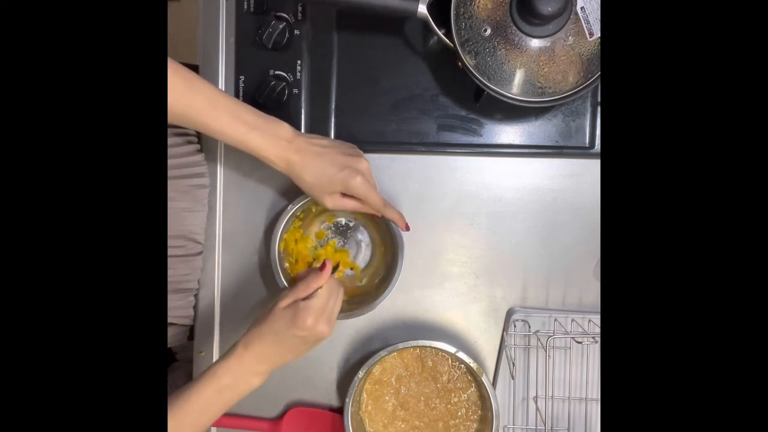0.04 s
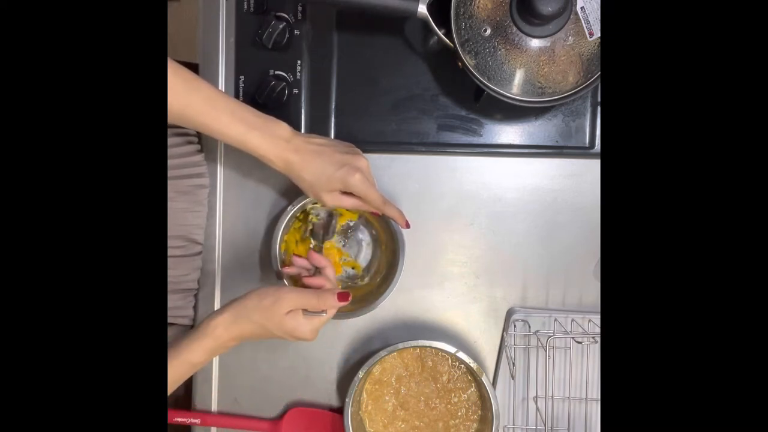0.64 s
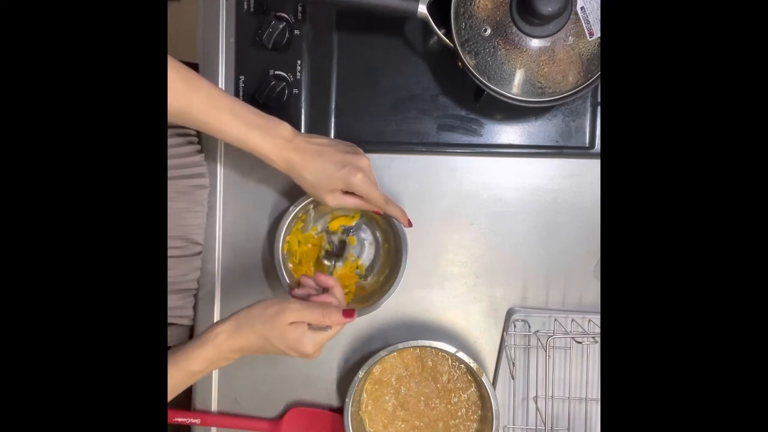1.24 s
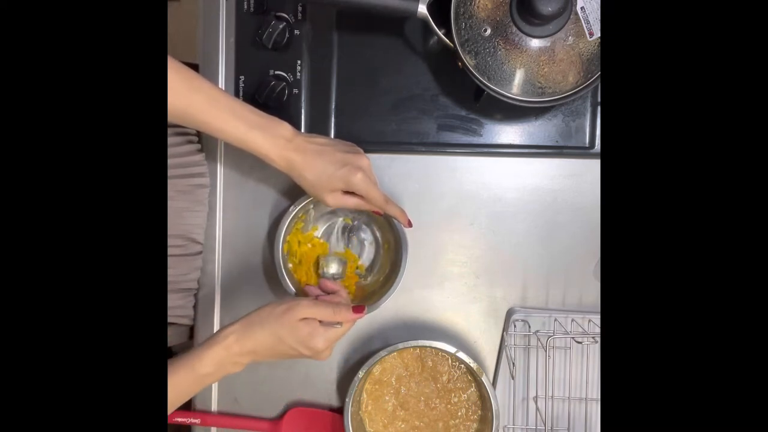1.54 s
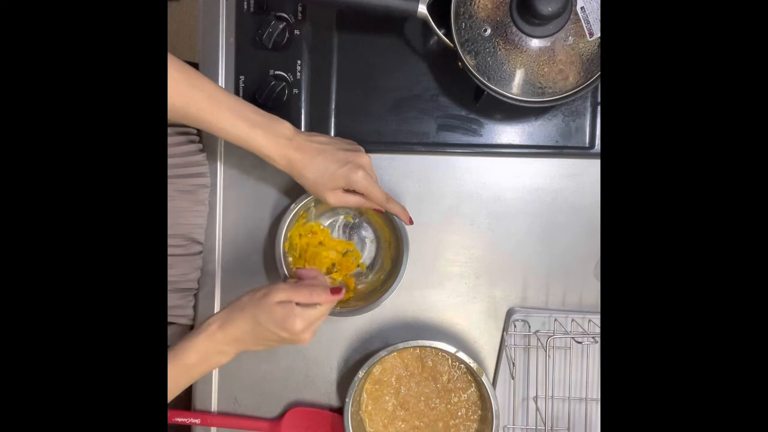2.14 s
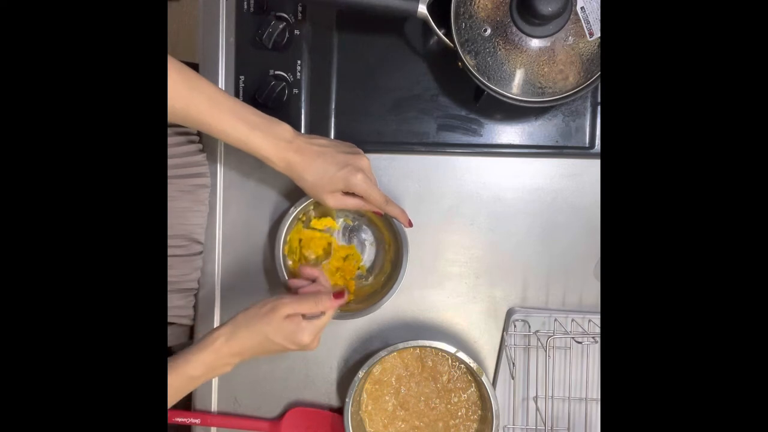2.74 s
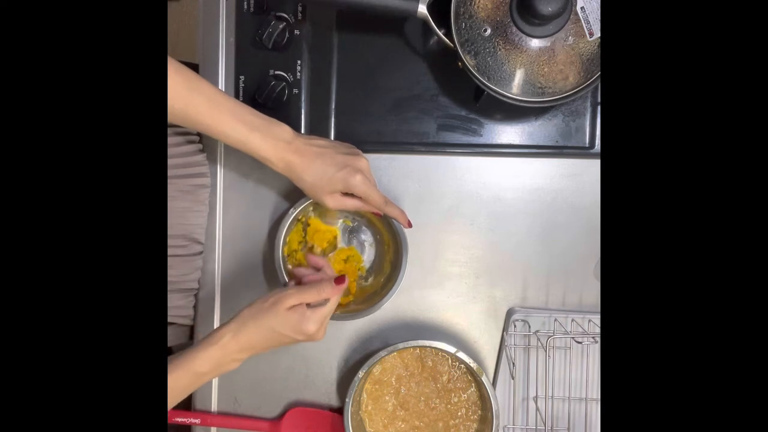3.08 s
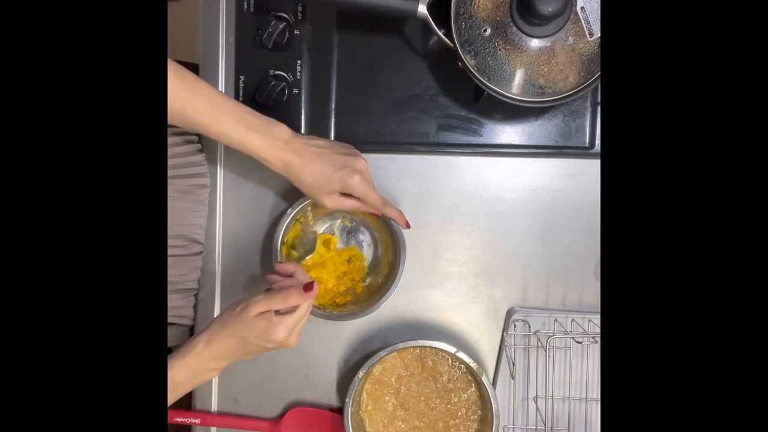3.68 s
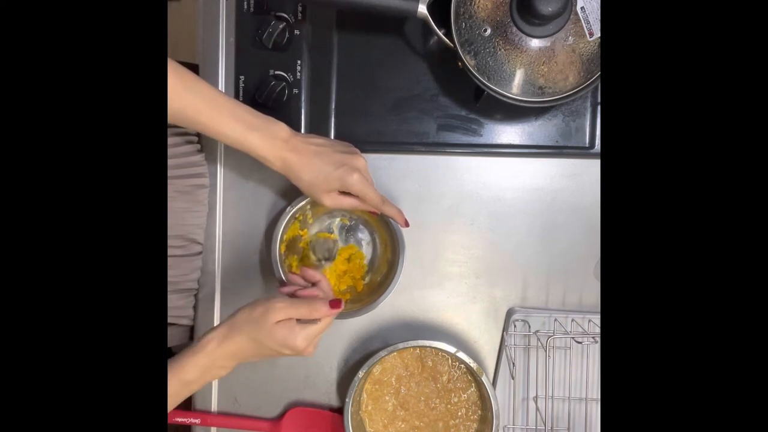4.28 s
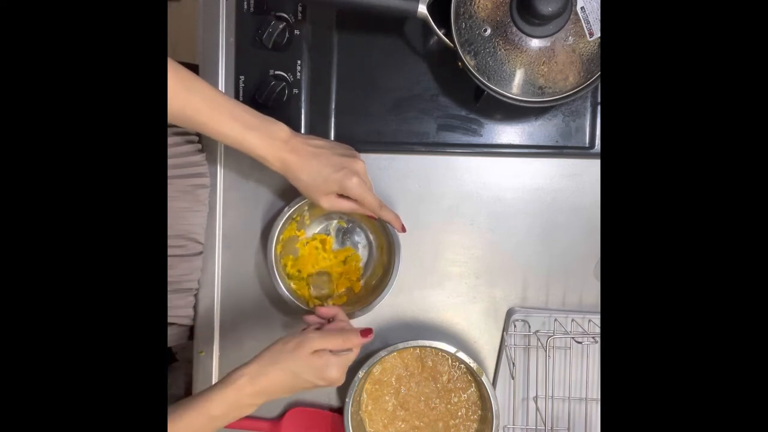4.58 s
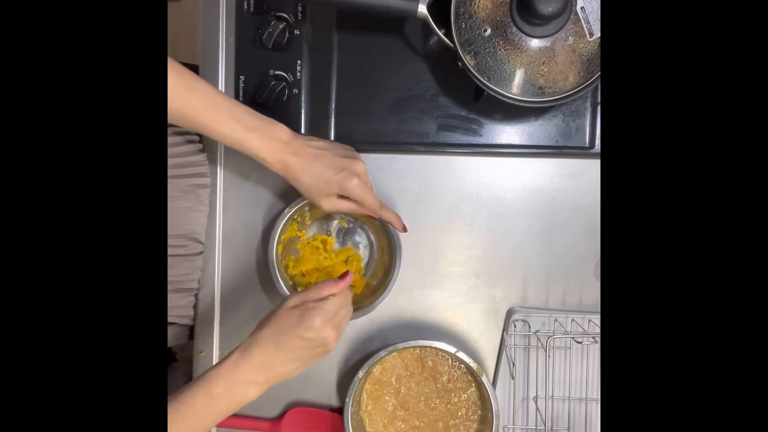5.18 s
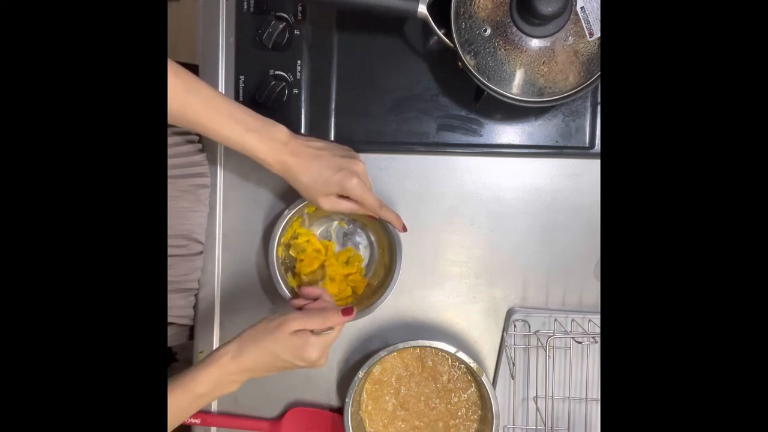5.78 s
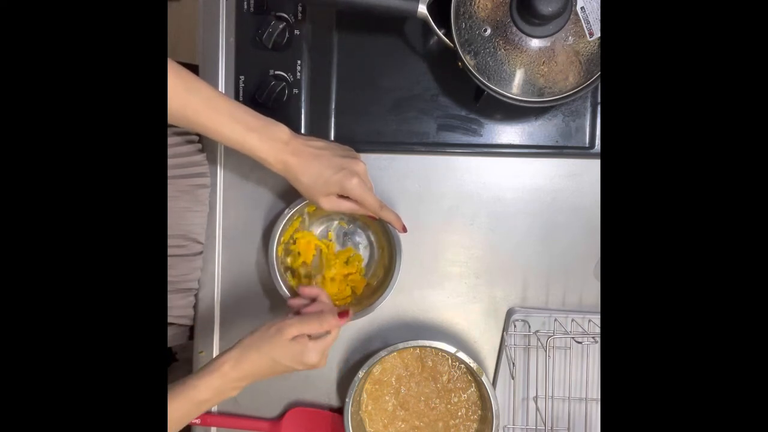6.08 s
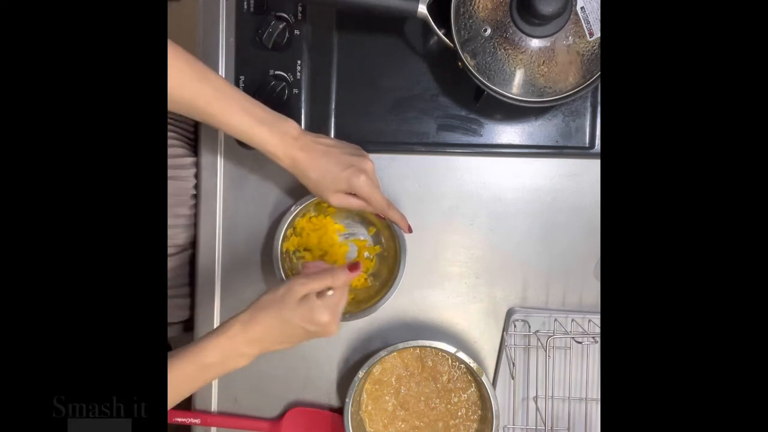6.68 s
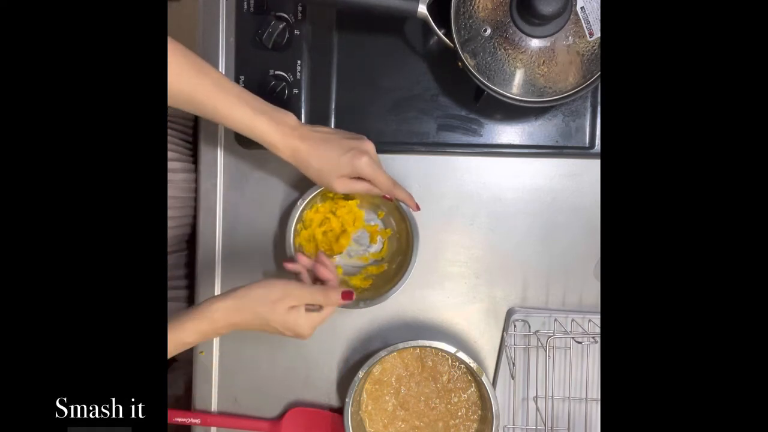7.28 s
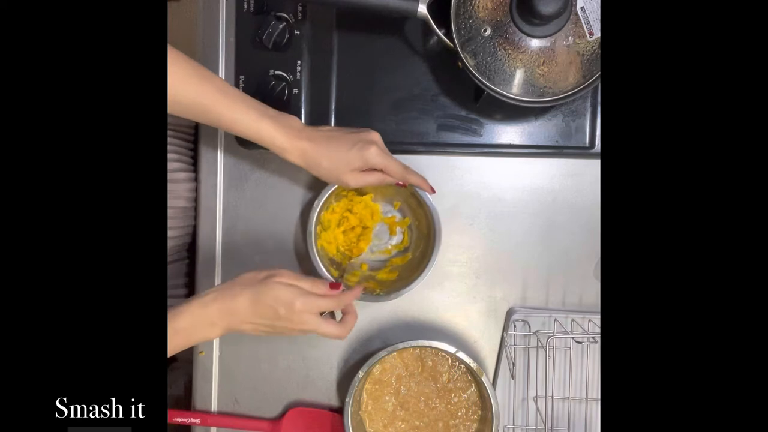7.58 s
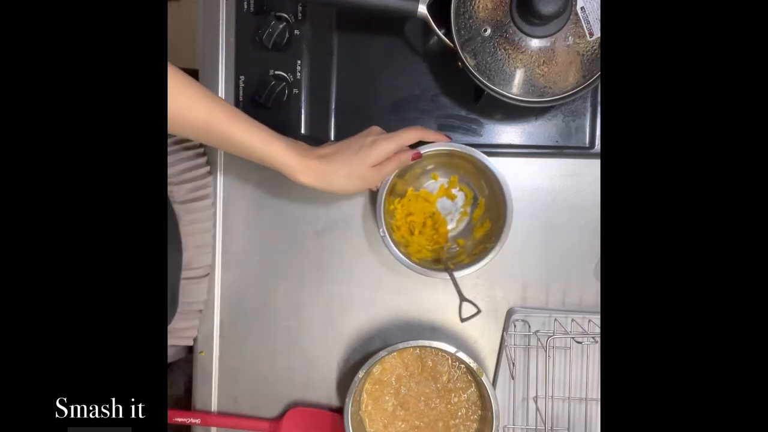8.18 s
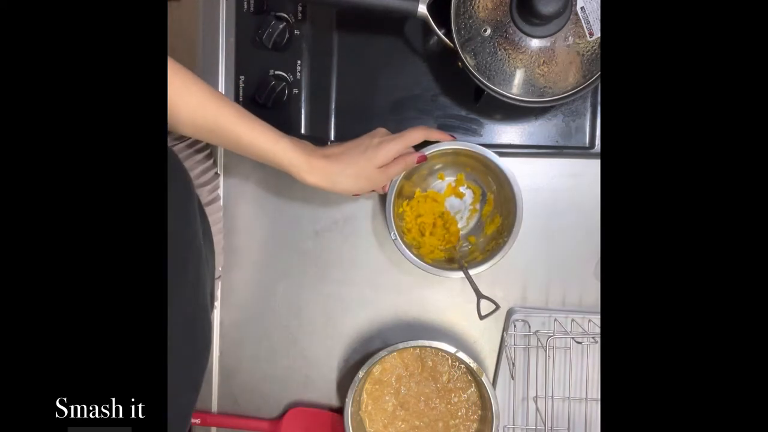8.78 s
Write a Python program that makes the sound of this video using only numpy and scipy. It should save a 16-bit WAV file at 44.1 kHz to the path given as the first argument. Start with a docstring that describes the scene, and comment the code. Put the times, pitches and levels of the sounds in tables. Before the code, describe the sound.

A metal spoon knocks and scrapes in a small steel bowl, mashing soft food over a steady extractor fan hum.

```python
"""Mashing food in a steel bowl

A steel spoon knocks through soft food into a small steel bowl, damped by one hand on a counter.
It scrapes the steel and squeezes hiss and wet pops from the mash. Near the end the bowl slides
aside and the spoon drops against the rim. An extractor fan hums underneath.
The whole sound fades out and back in once, a little after six seconds."""
import sys
import numpy as np
from scipy import signal
from scipy.fft import rfft, irfft, next_fast_len
from scipy.io import wavfile
from scipy.ndimage import map_coordinates

SR = 44100
rng = np.random.default_rng(int(sys.argv[2]) if len(sys.argv) > 2 else 0)


def output_pcm(signal):
    """Save a mono or channel-first signal as 16-bit PCM at the path in sys.argv[1].

    Samples are clipped to [-1, 1] before scaling.
    """
    pcm = np.clip(np.atleast_2d(signal).T, -1, 1) * 32767
    wavfile.write(sys.argv[1], SR, np.round(pcm).astype(np.int16))


N = 398223

# The dense high modes of spoon and bowl. Each row: frequency in Hz, relative level in dB.
STEEL_SPECTRUM = [(1500, -3.5), (2500, 7), (4300, 6), (5000, 1), (8500, -4), (9700, -3), (10700, -0.5),
                  (11800, 0.5), (13300, 6), (14700, -6.5), (16500, -13)]
# How wide the sound spreads. Each row: frequency in Hz, side minus mid in dB.
STEREO_WIDTH = [(40, -39), (120, -38.5), (260, -9.5), (450, -14.5), (800, 4.5), (1500, -7.5), (2300, 0.5),
                (3800, -5), (5200, 0), (6800, -16), (9000, -1.5), (11000, -1), (13000, 16), (15000, 43)]
# Which way the sound leans. Each row: frequency in Hz, left minus right in dB.
STEREO_LEAN = [(60, -.5), (130, -1), (270, -4.5), (450, -5), (1000, 1)]
FLAT = ((1000, 0),)  # a tone colour of 0 dB everywhere


def from_db(db):
    """Decibels to gain."""
    return 10 ** (np.asarray(db) / 20)


def rms_one(x):
    """Scale to unit rms."""
    return x / np.sqrt(np.mean(x ** 2) + 1e-20)


def at_hz(points, hz):
    """Read a curve on a log-frequency axis."""
    known, values = np.transpose(points)
    return np.interp(np.log(np.maximum(hz, 1)), np.log(known), values)


def add(out, start_s, sound):
    """Mix a sound in at its start time."""
    start = int(np.clip(round(start_s * SR), 0, N - 1))
    out[:, start:start + sound.shape[-1]] += sound[..., :N - start]


def drift(rate_hz, size):
    """A smooth random wobble with a spread of about 1."""
    hop = 32
    knots = rng.standard_normal(int(size / SR * rate_hz) + 4)
    positions = 1 + np.arange(size // hop + 2) * hop * rate_hz / SR
    coarse = map_coordinates(knots, [positions], order=3, mode="nearest")
    return np.interp(np.arange(size) / hop, np.arange(len(coarse)), coarse)


def lean(hz):
    """Left and right gains at a frequency."""
    return from_db(at_hz(STEREO_LEAN, hz) * np.array([[.5], [-.5]]))


def noise(spectrum, size, colour=FLAT):
    """Stereo noise of a given spectrum, brought to about unit rms and then tinted by colour."""
    padded = next_fast_len(size, True)
    hz = np.arange(padded // 2 + 1) * SR / padded
    shape = rms_one(from_db(at_hz(spectrum, hz)) * (hz > spectrum[0][0] / 2))
    mid, side = rfft(rng.standard_normal((2, padded))) * shape * from_db(at_hz(colour, hz))
    width = from_db(at_hz(STEREO_WIDTH, hz))
    stereo = (mid + side * width * [[1], [-1]]) / np.hypot(1, width)
    return irfft(stereo * lean(hz), padded)[:, :size]


def swell(size):
    """A stroke rises quickly and dies away more slowly."""
    return np.sin(np.pi * np.linspace(0, 1, size) ** 0.7).clip(0) ** 0.44


def fan(rotor_hz=19.65, wander=0.00796, flutter_share=0.72, flutter_hz=11, air_db=-45, rumble_db=-43.5):
    """The rotor's hum, shaken by turbulence, over rushing air, duct rumble and hood resonances."""
    # Rushing air and duct rumble. Each row: frequency in Hz, relative level in dB.
    air = [(330, 1), (550, 1), (750, -0.5), (900, -4.5), (1200, -7), (1700, -5), (2300, -4.5), (3000, -9),
           (4000, -13.5), (5000, -17), (7000, -23), (10000, -26.5), (12800, -26.5), (14200, -32.5),
           (16000, -51.5)]
    rumble = [(15, -33), (35, 7), (70, -6), (120, 11.5), (170, -10.5), (215, -0.5), (275, 8), (320, 0),
              (390, -4), (460, -26.5), (600, -46.5)]
    # The hum. Each row: multiple of the turning rate, relative level in dB.
    harmonics = [(2, -54.5), (3, -47.5), (4, -42.5), (5, -43.5), (6, -37), (7, -42.5), (8, -51), (9, -50.5),
                 (10, -50.5), (12, -49.5), (13, -51), (14, -47.5), (15, -53.5), (17, -54.5)]
    # Hood resonances. Each row: frequency in Hz, bandwidth in Hz, level in dB.
    hood_modes = [(766.6, 7.2, -59), (1045, 36, -70.5), (1192, 20, -64.5), (1431, 12, -58.5),
                  (2197, 7.2, -61), (2310, 5.5, -62.5), (2440, 36, -73)]
    rotor_angle = 2 * np.pi * np.cumsum(rotor_hz * (1 + wander * drift(3, N))) / SR
    out = from_db(air_db) * noise(air, N) + from_db(rumble_db) * noise(rumble, N)
    for multiple, db in harmonics:
        phase = multiple * rotor_angle + rng.uniform(0, 2 * np.pi)
        steady = np.sqrt(2 * (1 - flutter_share)) * np.sin(phase)
        shaken = drift(flutter_hz, N) * np.sin(phase) + drift(flutter_hz, N) * np.cos(phase)
        hum = steady + np.sqrt(flutter_share) * shaken
        out += from_db(db - 0.33) * lean(multiple * rotor_hz) * hum
    for hz, width_hz, db in hood_modes:
        radius = np.exp(-np.pi * width_hz / SR)
        feedback = [1, -2 * radius * np.cos(2 * np.pi * hz / SR), radius ** 2]
        out += from_db(db) * rms_one(signal.lfilter([1, 0, -1], feedback, rng.standard_normal((2, N))))
    return out


def rubbing(strokes, grain_db, slips_per_s=70, slip_decay_s=0.0012, slip_db=6):
    """A grainy hiss swells under each stroke, ticking wherever the surfaces stick and let go."""
    # The hiss of rubbing. Each row: frequency in Hz, relative level in dB.
    hiss = [(1500, 5.5), (3000, 3.5), (4500, 4), (7000, 0), (11000, 1), (12800, 3), (14500, -21)]
    out = np.zeros((2, N))
    for start, length, db in strokes:
        size = int(length * SR)
        slips = (rng.random(size) < slips_per_s / SR) * rng.uniform(.5, 1, size) * from_db(slip_db)
        ticks = signal.lfilter([1], [1, -np.exp(-1 / (slip_decay_s * SR))], slips + 1e-18)
        grains = from_db(grain_db * (drift(900, size) + drift(75, size)))
        add(out, start, from_db(db) * noise(hiss, size) * rms_one(grains + ticks) * swell(size))
    return out


def bowl_slide():
    """The bowl's base rubs the counter as it is pushed aside."""
    # Each row: start in seconds, length in seconds, level in dB.
    pushes = [(7.549, 0.4, -52), (7.94, 0.35, -52.5)]
    return rubbing(pushes, grain_db=0.5)


def kneading(strokes_per_s=6, length_s=0.12, level_db=-61, end_s=9, looseness=0.27):
    """Light spoon strokes in a loose rhythm, each a start and length in seconds and a level in dB."""
    strokes = []
    for k, (late, longer, harder) in enumerate(rng.uniform(-1, 1, (end_s * strokes_per_s, 3))):
        start = (k + .5 + looseness * late) / strokes_per_s
        strokes.append((start, length_s * np.exp(looseness * longer), level_db + harder))
    return strokes


def mash(pop_t60=0.014):
    """Soft food smears under the spoon, and small pockets of air burst in it."""
    # Firm strokes through the food. Each row: start in seconds, length in seconds, level in dB.
    firm_strokes = [(0.6, 0.1, -59), (1.09, 0.072, -55), (1.417, 0.095, -54.5), (1.905, 0.075, -50),
                    (2.615, 0.07, -52.5), (4.498, 0.2, -57), (4.92, 0.042, -54), (5.21, 0.1, -57),
                    (5.29, 0.094, -50), (6.813, 0.19, -51), (7.02, 0.11, -53.5), (7.25, 0.25, -56)]
    # The clearest wet pops. Each row: start in seconds, relative level in dB, pitch in Hz.
    clear_pops = [(0.1141, -43, 9000), (0.914, -51, 9000), (1.0045, -44, 10000), (1.016, -48, 9500),
                  (1.036, -43, 12500), (1.047, -46, 9000), (1.054, -45, 8500), (1.061, -41, 9000),
                  (2.365, -48, 9000), (2.887, -48, 9000), (3.5438, -47, 11000), (3.788, -47, 9000),
                  (4.5181, -42, 10000), (4.672, -42, 11000), (7.045, -43, 9000)]
    light_strokes = kneading()
    faint_pops = [(start + length / 2, -56.5, 8900) for start, length, _ in light_strokes]
    out = rubbing(firm_strokes + light_strokes, grain_db=2.5)
    t = np.arange(SR // 30) / SR
    for start, db, hz in clear_pops + faint_pops:
        pocket_spectrum = [(hz / 2, -19), (hz, 0), (hz * 2, -11)]
        add(out, start, noise(pocket_spectrum, len(t)) * from_db(db - 3 - 60 * t / pop_t60))
    return out


def scrapes(stereo_spread=0.67):
    """Friction feeds a resonance that glides as the contact moves over the bowl."""
    # Spoon drags on bowl, or bowl on counter.
    # Each row: start in seconds, length in seconds, level in dB, kind of contact.
    drags = [(1.081, 0.14, -51, "edge"), (1.919, 0.091, -46.5, "edge"), (5.201, .19, -45, "edge"),
             (5.972, 0.2, -58, "base"), (6.509, 0.12, -45.5, "base"), (6.805, 0.067, -41, "wall"),
             (6.817, 0.2, -46, "base"), (8.155, 0.084, -52, "counter"), (8.324, 0.34, -56, "squeak")]
    # The resonance of each contact. Each entry: first pitch, last pitch and bandwidth, all in Hz.
    resonances = {"base": (1240, 950, 170), "wall": (2170, 2020, 230), "edge": (1850, 1800, 1700),
                  "counter": (2050, 2200, 700), "squeak": (2405, 2430, 50)}
    out = np.zeros((2, N))
    for start, length, db, contact in drags:
        first_hz, last_hz, width_hz = resonances[contact]
        size = int(length * SR)
        phase = 2 * np.pi * np.cumsum(np.geomspace(first_hz, last_hz, size)) / SR
        lowpass = signal.butter(2, width_hz / 2, fs=SR, output="sos")
        friction = signal.sosfilt(lowpass, rng.standard_normal((2, 2, size)))
        mid, side = friction[0] * np.sin(phase) + friction[1] * np.cos(phase)
        rub = mid + stereo_spread * side * [[1], [-1]]
        add(out, start, from_db(db) * rms_one(rub) * swell(size))
    return out


def ringing(modes, t, colour=FLAT, scatter_db=1.5, detune=0.0022, rise_s=0.00045):
    """Struck modes die away; grip and mash vary their strength and pitch a little from blow to blow."""
    hz, db, t60 = np.transpose(modes)
    stronger, sharper = rng.standard_normal((2, len(hz)))
    strength_db = db + at_hz(colour, hz) + scatter_db * stronger
    envelopes = from_db(strength_db[:, None] - 60 * t / t60[:, None]) * (1 - np.exp(-(t / rise_s) ** 2))
    detuned_hz = hz * (1 + detune * sharper)
    phase = 2 * np.pi * detuned_hz[:, None] * t + rng.uniform(0, 2 * np.pi, (len(hz), 1))
    # Neighbouring modes radiate to opposite sides, so left and right are out of step.
    skew = 0.88 * np.arctan(from_db(at_hz(STEREO_WIDTH, hz))) * (-1) ** np.arange(len(hz))
    return np.array([(envelopes * np.sin(phase + side * skew[:, None])).sum(axis=0) for side in (1, -1)])


def spoon_drop(tick_t60=0.016, thump_hz=121, thump_t60=0.07, room_t60=0.13):
    """Each bounce on the rim ticks, rings the spoon and thumps the counter through the bowl."""
    # Each row: start in seconds, level in dB.
    bounces = [(7.735, -31.5), (7.7386, -40), (7.7428, -38), (7.7465, -39.5), (7.753, -44), (7.771, -41),
               (7.779, -43.5)]
    # The free spoon's ring. Each row: frequency in Hz, relative level in dB, t60 in seconds.
    spoon_modes = [(1280, -6, 0.052), (1640, -11, .05), (1990, -4.5, 0.048), (2740, -6, .06),
                   (3040, -10, .07), (3335, -4, .06), (3560, -10, .07), (3860, -14, .06), (4150, -12, .06),
                   (4420, -14, .08), (4900, -11, .06), (7246, -11, .04), (7740, -17, .06),
                   (11600, -12, .05)]
    # What the walls throw back. Each row: frequency in Hz, relative level in dB.
    reflections = [(700, -8), (1300, -3), (2500, -1), (4500, 0), (6000, -15), (8000, -13), (12000, -13),
                   (15000, -28)]
    out = np.zeros((2, N))
    t = np.arange(SR // 4) / SR
    thump = np.sin(2 * np.pi * thump_hz * t) * from_db(13.5 - 60 * t / thump_t60)
    for start, db in bounces:
        tick = noise(STEEL_SPECTRUM, len(t)) * from_db(1 - 60 * t / tick_t60)
        room = noise(reflections, len(t)) * from_db(-7 - 60 * t / room_t60)
        add(out, start, from_db(db) * (tick + ringing(spoon_modes, t) + thump + room))
    return out


def flex(pitch_hz, level_db, t, colour):
    """Base and wall swing for a few cycles under the spoon; hob and counter echo the pulse."""
    # Each row: multiple of the flex pitch, relative level in dB, rise in seconds.
    partials = [(1, 9, 0.0015), (1.75, -1.5, 0.0015)]
    # The close echoes. Each row: delay in seconds, left gain in dB, right gain in dB.
    echoes = [(0.0019, -23, -9), (0.0062, -6.5, -20.5)]
    multiple, db, rise_s = np.transpose(partials)
    hz = pitch_hz * multiple
    age = t / rise_s[:, None]
    envelopes = from_db(level_db + db + at_hz(colour, hz))[:, None] * (age * np.exp(1 - age)) ** 2
    pulse = (envelopes * np.sin(2 * np.pi * hz[:, None] * t)).sum(axis=0)
    return pulse + sum(from_db([[left_db], [right_db]]) * np.interp(t - delay, t, pulse)
                       for delay, left_db, right_db in echoes)


def knock(flex_hz, flex_db, colour, crack_t60=0.014, crack_rise_s=0.0003,
          room_t60=0.17, room_rise_s=0.0036):
    """One blow: the steel cracks and flexes, the bowl's modes take over, then the near walls answer."""
    # The hand-damped bowl. Each row: frequency in Hz, relative level in dB, t60 in seconds.
    bowl_modes = [(329.5, -8, 0.17), (567, -1, .08), (578, -4, 0.062), (762, 3.5, 0.057), (821, -4.5, 0.15),
                  (968, 0, .17), (1022, 0, 0.14), (1030, -6.5, 0.22), (1087, -4, 0.13), (1198, -2.5, 0.13),
                  (1255, -3.5, 0.13), (1418, -1.5, 0.063), (1495, -2.5, 0.053), (1677, 2.5, 0.027),
                  (1946, -6.5, 0.11), (1963, -4, 0.12), (2052, -4, 0.14), (1985, -7.5, .09),
                  (2235, -10, .11), (2255, -6.5, 0.097), (2387, -7.5, .09), (2650, -11, .09),
                  (2870, -11, 0.099), (2950, -15.5, .07), (3125, -11, 0.11), (3720, -10, 0.064),
                  (4210, -11.5, 0.082), (4280, -11, 0.082), (4500, -16.5, .08)]
    # What walls and counter throw back. Each row: frequency in Hz, relative level in dB.
    reflections = [(200, -0.5), (480, 0), (700, 4.5), (830, 3.5), (1100, 6.5), (1550, -5.5), (2050, 2.5),
                   (2600, -7), (4200, -10.5), (5200, -17.5), (9000, -23.5), (10700, -20.5), (11800, -23),
                   (13400, -19.5), (14500, -35)]
    t = np.arange(SR // 4) / SR
    crack = noise(STEEL_SPECTRUM, len(t), colour) * from_db(4.5 - 60 * t / crack_t60)
    crack *= 1 - np.exp(-t / crack_rise_s)
    ring = ringing(bowl_modes, t, colour)
    room = noise(reflections, len(t), colour) * from_db(3.5 - 60 * t / room_t60)
    room *= 1 - np.exp(-(t / room_rise_s) ** 2)
    return crack + flex(flex_hz, flex_db, t, colour) + ring + room


def spoon_knocks(node_db=-8.5, node_octaves=0.1):
    """The place of contact and the mash under the spoon decide which modes take each blow."""
    # Each row: start in seconds, level in dB, flex pitch in Hz, flex and thud in dB, wall ring in Hz,
    # then wall ring, upper-wall clink, edge ring and top glint in dB, and the node's frequency in Hz.
    blows = [(0.344, -40, 1060, -5, 1.5, 2060, -16, -12, -8, -2, 1700),
             (0.698, -28.5, 1084, 2, -1.5, 2030, 0, -3, -11, 3, 2580),
             (1.393, -39, 1390, 5.5, 4.5, 1700, 3, -6, 4, 10, 1020),
             (2.735, -19.5, 1160, 2.5, 0, 1990, -5.5, -9, -14.5, -0.5, 2700),
             (3.099, -20.5, 1040, -1, -2.5, 2040, -11.5, -19, -11.5, 4.5, 2820),
             (3.4165, -31.5, 1030, -4, 1, 2220, 6.5, 5.5, 0.5, -2, 1290),
             (3.704, -30.5, 1080, -9, -1, 2180, 7, -4, -5.5, 6, 1310),
             (4.024, -28.5, 1030, -5, 3.5, 2120, 9, 1, 2.5, 8, 1310),
             (4.869, -38, 1210, -1, 1.5, 2180, 6, 8, 2.5, 8, 930),
             (5.192, -43, 1280, 0, -6, 2060, 3, -4, 12, 5, 900),
             (5.691, -19.5, 1244, 3.5, -1.5, 2030, -2, -10, -11, 0, 880),
             (6.269, -27, 1170, 1.5, -6, 2060, -9.5, -14, -9.5, 10, 1700),
             (6.504, -27, 1260, -4, -6, 2080, 6, 4, -3.5, 13.5, 1470),
             (6.789, -26, 1360, 2.5, -2, 2070, 2.5, -5, 0, 10.5, 1730),
             (7.131, -30, 1190, 5, -3, 2050, -3.5, -22, -6.5, 7.5, 1660)]
    out = np.zeros((2, N))
    hz = np.geomspace(100, 20000, 300)
    for start, db, flex_hz, flex_db, *tone in blows:
        thud_db, wall_hz, wall_db, clink_db, edge_db, glint_db, node_hz = tone
        tick_db = 0.53 * edge_db  # the more the spoon's edge rings, the sharper the tick
        # Band levels are relative to the ring of the base at 1130 Hz.
        bands = [(640, thud_db), (1130, 0), (wall_hz, wall_db), (3020, clink_db),
                 (3100, edge_db), (7560, tick_db), (12800, glint_db)]
        # Modes with a node under the spoon are barely struck.
        notch_db = node_db * np.exp(-(np.log2(hz / node_hz) / node_octaves) ** 2)
        colour = np.column_stack([hz, at_hz(bands, hz) + notch_db])
        add(out, start, from_db(db) * knock(flex_hz, flex_db, colour))
    return out


def fade(quietest_s=6.226, out_s=0.63, in_s=0.61, floor_db=-53):
    """A gain that sinks to near silence and rises again in a straight line."""
    t = np.arange(N) / SR
    falling = np.clip((quietest_s - t) / out_s, 0, 1) ** 1.03
    rising = np.clip((t - quietest_s) / in_s, 0, 1)
    return np.maximum(falling + rising, from_db(floor_db))


def scene():
    """Spoon, bowl and mash over the fan."""
    return spoon_knocks() + spoon_drop() + fan() + scrapes() + bowl_slide() + mash()


def record(dry):
    """The mix fades out and back in, and the treble is cut steeply above 16.4 kHz."""
    lowpass = signal.ellip(10, .1, 90, 16400, fs=SR, output="sos")
    return signal.sosfilt(lowpass, dry * fade())


dry = scene()
out = record(dry)
output_pcm(out)
```